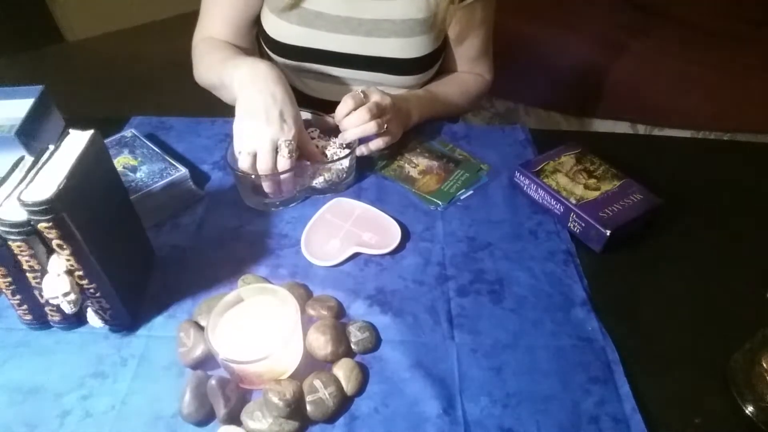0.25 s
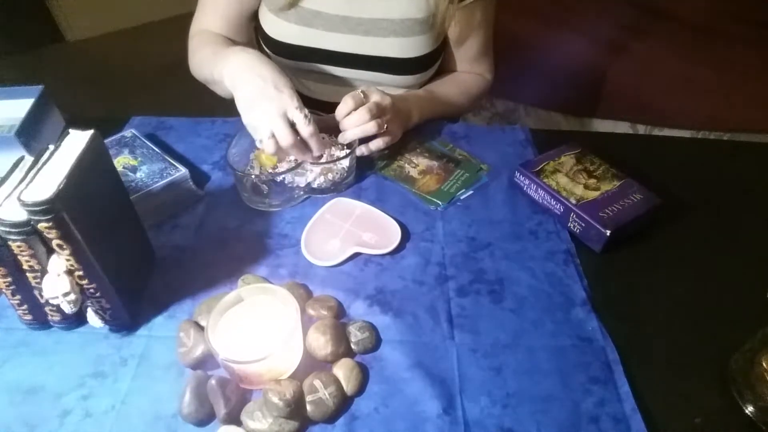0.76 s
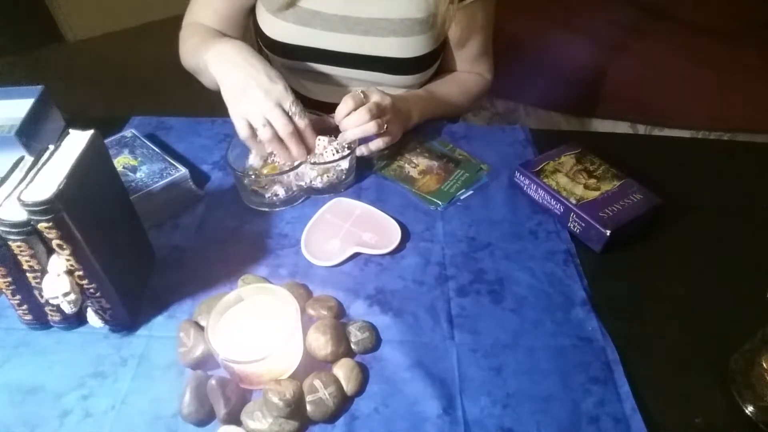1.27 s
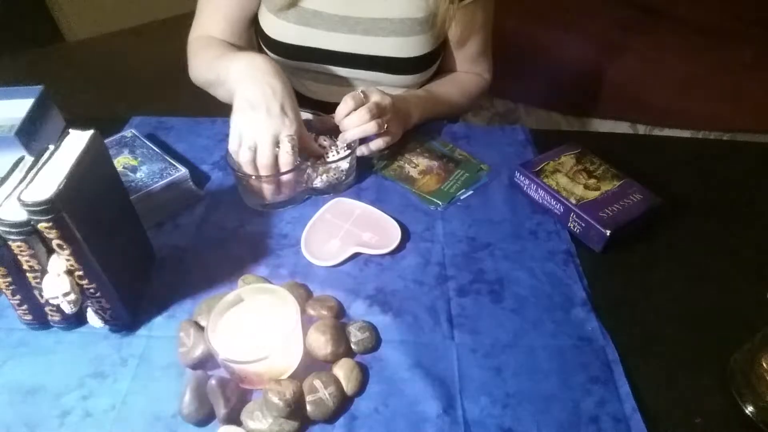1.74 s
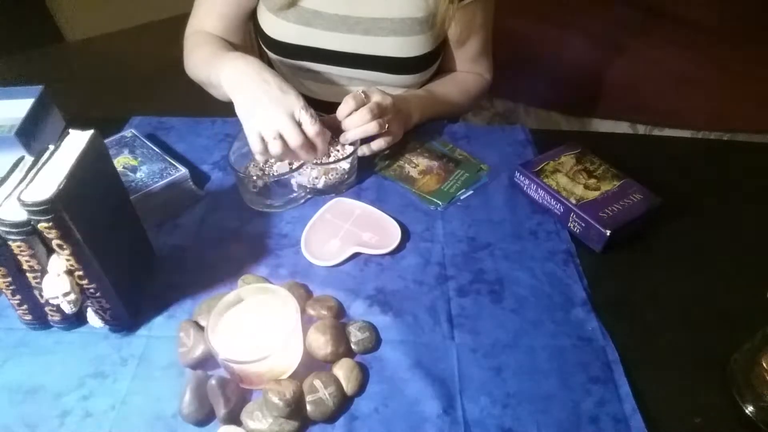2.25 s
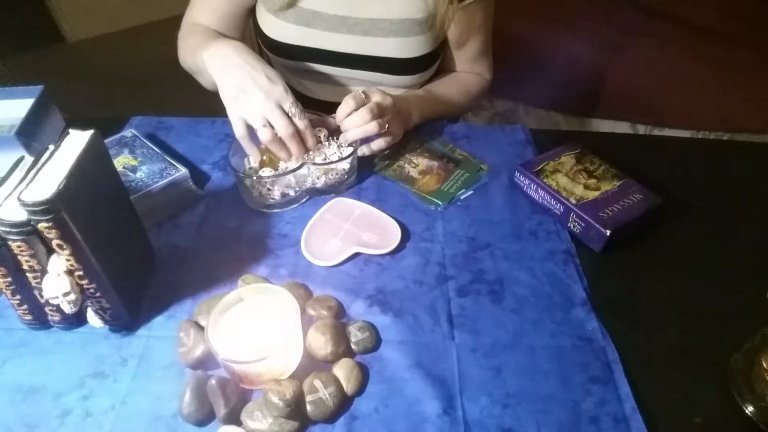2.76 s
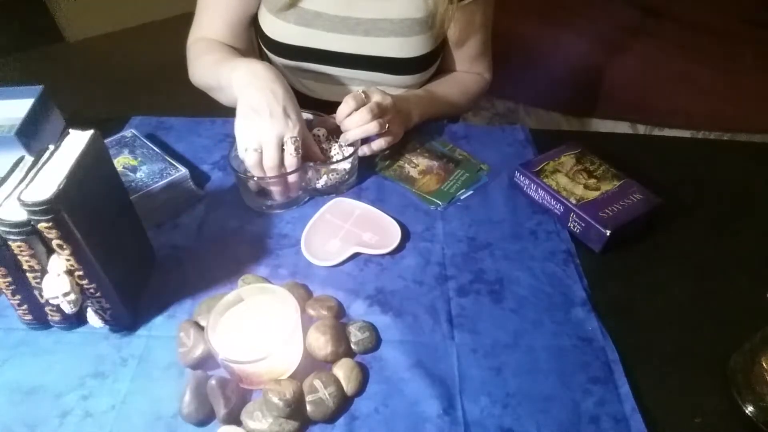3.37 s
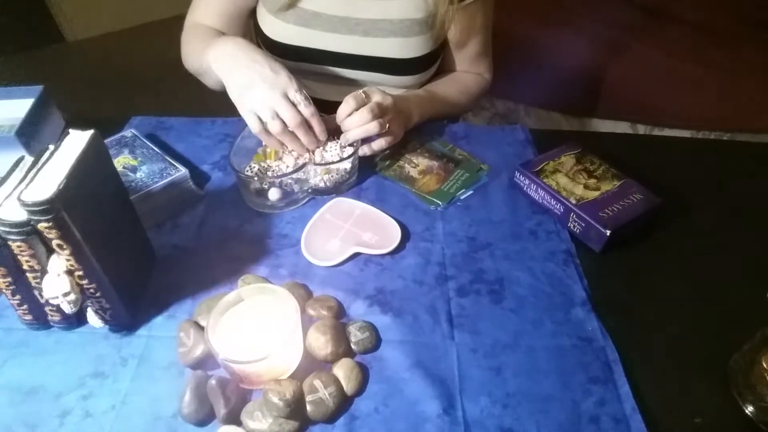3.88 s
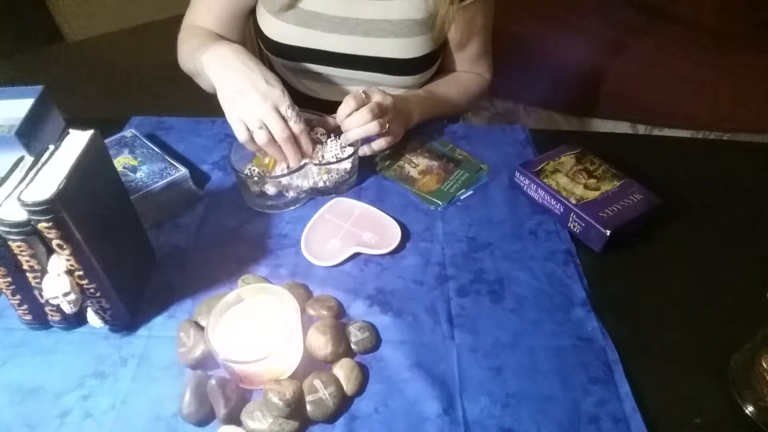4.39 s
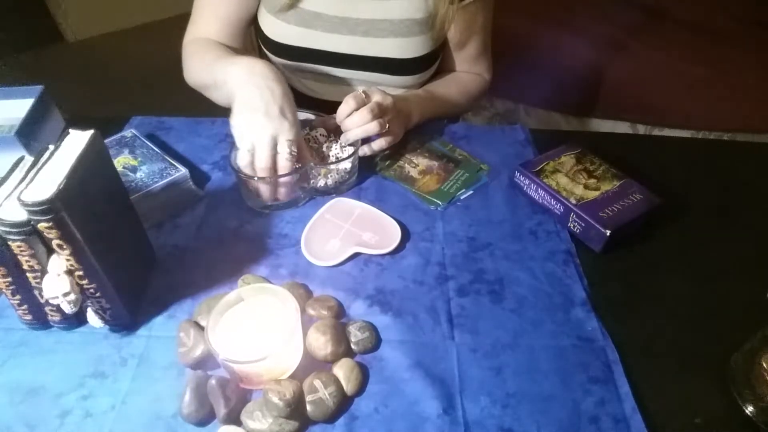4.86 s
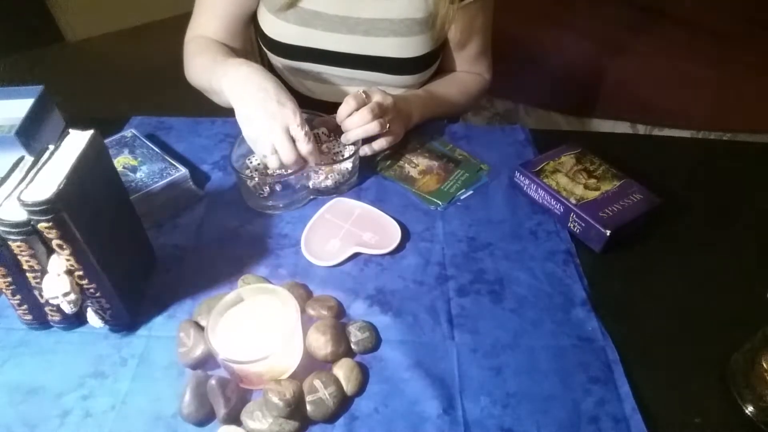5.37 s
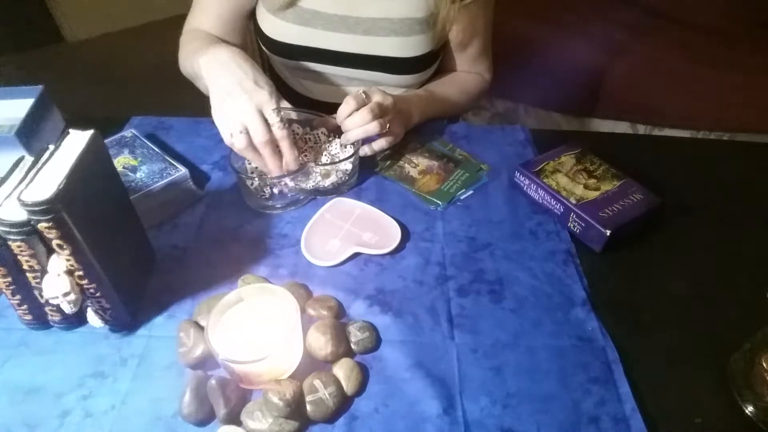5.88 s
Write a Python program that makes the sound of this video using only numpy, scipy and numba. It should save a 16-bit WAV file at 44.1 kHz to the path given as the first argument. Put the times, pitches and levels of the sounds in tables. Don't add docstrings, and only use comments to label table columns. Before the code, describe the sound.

A hand stirs small metal charms and beads in a glass bowl on a cloth-covered table, heard very close in stereo in a small quiet room with a short echo. After a faint start and brief gap, bright dry ticks and glassy clinks gather in quick pushes, with a hard clack near 0.4 s and a strong one at 0.9. The rattle is dense around 1.3 s, dips near 1.7, then continues in bursts, lively from 2.4 to 3.1 with heavier knocks. It nearly stops at about 3.2-3.3 s, resumes, thins near 4.1, and clacks loudly at 4.3 and 4.5 with ringing glass and a table thud. Another tiny lull comes around 4.75, then uneven stirring runs to the end just after 6 s, with bowl bumps near 5.5. Thin high charm pings and very faint rubbed whistles glint throughout over soft low room tone.

```python
import sys
import numpy as np
from scipy import signal
from scipy.fft import rfft, irfft, next_fast_len
from scipy.io import wavfile
from scipy.ndimage import uniform_filter1d
from numba import njit

SR = 44100
rng = np.random.default_rng(int(sys.argv[2]) if len(sys.argv) > 2 else 0)


def gain_from_db(level_db):
    decades = np.asarray(level_db, float) / 20
    return 10 ** decades


def generate_wav(sig):
    pcm = np.round(np.clip(np.atleast_2d(sig).T, -1, 1) * 32767).astype(np.int16)
    wavfile.write(sys.argv[1], SR, pcm)


N = 270377

# (frequency [Hz], level [dB], t60 [s])
BOWL_LOW = [(1017.4, 2.5, 0.068), (1116, 0, 0.065), (1235, -5, 0.06), (1724, 4, 0.036), (1810, 4, 0.03),
            (1890, -6, 0.02)]
# (frequency [Hz], level [dB], t60 [s])
BOWL_HIGH = [(2606, -7, 0.027), (2945, -10.5, 0.083), (3050, 1.5, 0.019), (3318, -5, 0.041),
             (3676, -1, 0.016), (3972, -1.5, 0.034), (4850, -1.5, 0.02), (4770, 5.5, 0.0079),
             (5150, 5, 0.019), (5940, -21, 0.051), (6000, 0, 0.041), (6850, 11, 0.01), (7326, 12, 0.0099),
             (7720, 2, 0.03)]
# (frequency [Hz], level [dB], t60 [s])
TABLE_TOP = [(139.7, -2.5, 0.052), (155.4, -8.5, 0.14), (200.2, 0, 0.13), (234.2, -2.5, 0.19),
             (284.2, 0.5, 0.083), (317.4, 6, 0.027), (394, -2.5, 0.11), (457.4, 1, 0.032),
             (499.4, 3.5, 0.044), (574, -5.5, 0.038)]
# (frequency [Hz], phase [rad])
PORT_SCATTER = [(150, 0.77), (600, 0.095), (3000, 0.79), (8000, 2.52), (14000, 1.5)]


def evened(x):
    return x / np.sqrt(np.mean(x ** 2) + 1e-20)


def read(points, hz):
    f, value = np.transpose(points)
    return np.interp(np.log(hz + 1), np.log(f + 1), value)


def shaped(x, gain):
    size = next_fast_len(x.shape[-1] + 2048)
    spectrum = rfft(x, size) * gain(np.fft.rfftfreq(size, 1 / SR))
    return irfft(spectrum, size)[..., :x.shape[-1]]


def add(mix, s, sound):
    part = mix[:, round(s * SR):][:, :sound.shape[1]]
    part += sound[:, :part.shape[1]]


def plateau(start, hold, rise, fall):
    t = np.arange(N) / SR
    return -rise * np.maximum(start - t, 0) - fall * np.maximum(t - start - hold, 0)


def rings(modes, count, detune, rise_s=0.00047):
    uneven_db = 5.5
    hz, db, t60 = np.transpose(modes)[:, None, None, :, None]
    t = np.arange(3600) / SR
    strength, pitch, phase = rng.standard_normal((3, count, 1, len(modes), 1))
    port_phase = phase * read(PORT_SCATTER, hz) * np.array([.5, -.5])[:, None, None]
    level = gain_from_db(db + uneven_db * np.clip(strength, -2, 1))
    decay = gain_from_db(-60 * t / t60) * np.minimum(t / rise_s, 1)
    tone = np.sin(2 * np.pi * hz * (1 + detune * pitch) * t + port_phase)
    return evened((level * decay * tone).sum(2))


def ticks(count, ms, snap=0.):
    # (frequency [Hz], level [dB])
    tick_colour = [(300, -40), (800, -22.5), (1500, -18.5), (2300, -23.5), (3500, -6), (5000, -6),
                   (7300, -3.5), (8300, -4.5), (10300, -4), (13000, -2), (15700, -1.5)]
    # (frequency [Hz], share [ratio])
    one_port = [(200, .3), (2000, 1.75), (6000, 0.9), (12000, 3.36)]
    shared = rng.standard_normal((count, 1, 800))
    own = rng.standard_normal((count, 2, 800))
    late_ms = (np.arange(800) - 60) * 1000 / SR
    envelope = (np.exp(-late_ms / ms) + snap * np.exp(-late_ms / .8)) * (late_ms >= 0)
    both = shared * envelope + shaped(own * envelope, lambda hz: read(one_port, hz))
    return evened(shaped(both, lambda hz: gain_from_db(read(tick_colour, hz))))[..., 40:]


@njit
def strike(responses, at, place, size, length):
    span = responses.shape[2]
    out = np.zeros((2, length + span))
    for k in range(len(at)):
        for port in range(2):
            for i in range(span):
                out[port, at[k] + i] += size[k] * responses[place[k], port, i]
    return out


def shower(responses, per_s, spread_db, level_db, reach):
    clump = gain_from_db(2.4 * evened(uniform_filter1d(rng.standard_normal(N), 900)))
    hit = rng.random(N) < per_s / SR
    sign = rng.choice([-1., 1.], N)
    size = np.minimum(rng.exponential(1, N), 4)
    fingers = np.arange(N) / SR * 14 + reach * rng.standard_normal(N)
    place = np.floor(fingers).astype(int) % len(responses)
    blows = evened(hit * sign * gain_from_db(spread_db * size) * clump) * gain_from_db(level_db)
    at = np.flatnonzero(blows)
    out = strike(np.ascontiguousarray(responses), at, place[at], blows[at], N)[:, :N]
    return out / np.sqrt(np.mean(np.sum(responses ** 2, 2)))


def hush():
    # (frequency [Hz], density [dB per Hz])
    tone_colour = [(15, -34), (30, -9), (55, 9.5), (90, -4.5), (130, 10.5), (260, -11), (1200, -21.5),
                   (7300, -43), (16000, -48)]
    level_db = -54.5
    noise = rng.standard_normal((1, N)) + 0.27 * rng.standard_normal((2, N))
    return gain_from_db(level_db) * evened(shaped(noise, lambda hz: gain_from_db(read(tone_colour, hz))))


def hand():
    # (time [s], rattle [dB], weight on the bowl [dB against the rattle])
    drag = [(0, -39.5, -1), (.06, -66.5, 7), (.15, -41.5, 3.5), (.7, -41.5, -5), (1.63, -37.5, -6),
            (1.72, -55, -14), (1.78, -41, -2), (3.141, -38.5, -3.5), (3.26, -71, -13), (3.3, -58, 5),
            (3.4, -37, -3.5), (3.95, -38.5, -4.5), (4.08, -48, -4), (4.35, -38.5, -4.5), (4.66, -40, 0),
            (4.758, -77, -22), (4.81, -51, 7.5), (6.13, -45, 0)]
    # (start [s], hold [s], rattle [dB], weight on the bowl [dB against the rattle])
    pushes = [(0.203, 0.068, -35, -4), (0.327, 0.068, -35, -28), (0.412, 0.024, -36, -7),
              (.48, 0.12, -37.5, -5), (0.782, 0.13, -36.5, -2.5), (0.928, 0.044, -33.5, -2.5),
              (1.026, 0.06, -41.5, -8), (1.207, 0.052, -34.5, -3.5), (1.325, 0.058, -30, -5),
              (1.438, 0.044, -33.5, -6.5), (1.791, 0.033, -35, -2), (1.953, 0.064, -36, -6),
              (2.078, 0.038, -33, -11.5), (2.167, 0.14, -38.5, -24), (2.42, 0.093, -37.5, -5),
              (2.752, 0.041, -31.5, -7.5), (2.871, 0.11, -31, -8.5), (3.394, 0.14, -42.5, -15),
              (3.561, 0.14, -34.5, -10), (3.783, 0.11, -39, -3), (4.165, 0.039, -39, -6.5),
              (4.31, 0.012, -45, 1), (4.429, 0.16, -34, -1.5), (4.894, 0.099, -37.5, -4.5),
              (5.092, 0.098, -37.5, -5.5), (5.263, 0.03, -35.5, -10), (5.358, 0.072, -39, -22),
              (5.52, .12, -34, -2.5), (5.78, 0.13, -35.5, -8), (6.032, 0.095, -37.5, -9.5)]
    s, level_db, weight_db = np.transpose(drag)
    t = np.arange(N) / SR
    glass = gain_from_db(2 * np.interp(t, s, level_db))
    table = glass * gain_from_db(2 * np.interp(t, s, weight_db))
    for start, hold, level_db, weight_db in pushes:
        push = gain_from_db(2 * (level_db + plateau(start, hold, rise=341, fall=199)))
        glass = glass + push
        table = table + push * gain_from_db(2 * weight_db)
    return 10 * np.log10(glass), 10 * np.log10(table / glass)


def rattle():
    # (frequency [Hz], level [dB], t60 [s])
    charm_modes = [(8920, -5, .06), (9170, -6, .05), (9670, -1, .06), (10800, -2, .03), (11000, -4, .03),
                   (11900, -2, .05), (12900, -3, .025), (14050, -1, .025), (15200, -3, .06),
                   (15620, 1, .045)]
    glass_db, weight_db = hand()
    lively_db = glass_db + 34
    fizz_db = glass_db - 3.5 + 0.069 * lively_db
    low_db = glass_db - 9.7 + 0.51 * weight_db - 0.018 * lively_db
    table_db = glass_db + weight_db - .7
    tick = ticks(count=70, ms=1.0)
    dull = shaped(tick, lambda hz: 1 / (1 + (hz / 9000) ** 12))
    high = rings(BOWL_HIGH, count=24, detune=0.01)
    fizz = rings(charm_modes, count=22, detune=0.0066)
    low = rings(BOWL_LOW, count=18, detune=0.02)
    rumble = rings(TABLE_TOP, count=16, detune=.012, rise_s=.004)
    mix = shower(dull, 1100, 2.6, glass_db - 4, reach=2.5)
    mix += shower(tick - dull, 2000, 1.9, fizz_db + 2.0, reach=3.5)
    mix += shower(high, 600, 2.14, glass_db - 2.5, reach=0.77)
    mix += shower(fizz, 800, 1.74, fizz_db - 2.5, reach=0.65)
    mix += shower(low, 700, 2.5, low_db - 2.5, reach=.8)
    return mix + shower(rumble, 800, 2.0, table_db - 2.5, reach=3.0)


def knocks():
    # (time [s], peak [dB], brightness [dB], low ring [dB])
    heavy_pieces = [(0.0986, -28, -3.5, -0.5), (0.418, -5.5, -16, -26), (0.5164, -14, -13, -13),
                    (0.6262, -15.5, -28, -13.5), (0.9313, -5.5, -37, -21), (1.102, -16, -14, -33),
                    (1.5828, -9.5, -41, -16), (1.6042, -11, -30, -23), (1.7445, -40, -9, 2),
                    (2.0617, -13.5, -31, -10.5), (2.2833, -16, -2, -26), (2.4057, -7.5, -28.5, -13),
                    (2.5556, -11, -22, -14), (2.659, -16, -48, -19), (2.7033, -25, -22, -0.5),
                    (2.7634, -10, -6, -29), (3.2975, -20.5, -20, -6.5), (3.3631, -24.5, -13, -3.5),
                    (3.893, -9.5, -21, -24), (4.2027, -17, -8, -22), (4.227, -15, -18, -38),
                    (4.297, -6, -12, -35), (4.5165, -12, -29, -17), (4.7774, -20.5, -46, -10.5),
                    (4.8045, -19, -33, -15), (5.229, -18, -10, -34), (5.5149, -20.5, -11, -9),
                    (5.5625, -17, -3, -13), (5.815, -25, -4, -3), (6.1041, -9, -10, -24)]
    # (time [s], peak [dB])
    light_taps = [(.168, -26), (.201, -22), (.247, -28), (.2725, -16.5), (.424, -16), (.454, -19),
                  (.807, -20), (.8617, -16), (.9103, -18), (.939, -19), (.944, -17), (.977, -18),
                  (1.003, -22), (1.055, -24), (1.2002, -19), (1.3976, -26), (1.531, -22), (1.611, -20),
                  (1.621, -17), (1.7694, -20), (2.1825, -21), (2.3, -21), (2.3984, -15), (2.448, -19),
                  (2.5275, -15), (2.5895, -17), (2.7487, -15), (2.757, -15), (2.7685, -12), (2.9097, -12),
                  (2.917, -14), (3.025, -19), (3.109, -15), (3.4007, -19), (3.6302, -19), (3.719, -14),
                  (3.881, -22), (3.995, -26), (4.15, -23), (4.461, -17), (4.523, -14), (4.531, -15),
                  (4.58, -18), (4.836, -22), (4.893, -25), (4.923, -24), (5.161, -17), (5.523, -13),
                  (5.635, -14), (5.729, -23), (5.7738, -21), (5.795, -19), (5.8555, -20), (5.878, -20),
                  (6.009, -28), (6.0566, -17), (6.0864, -30), (6.12, -15)]
    rows = heavy_pieces + [(s, db, -10, -13) for s, db in light_taps]
    mix, count = np.zeros((2, N)), len(rows)
    crack = ticks(count=count, ms=3.3, snap=1.6)
    high = rings(BOWL_HIGH, count=12, detune=.003)
    low = rings(BOWL_LOW, count=12, detune=0.012)
    thud = rings(TABLE_TOP, count=12, detune=0.051, rise_s=0.0042)
    bounce_s = rng.uniform(0.0052, 0.0092, count)
    for k, (s, peak_db, bright_db, low_db) in enumerate(rows):
        spot = k % len(high)
        sound = gain_from_db(-29) * high[spot]
        sound = sound + gain_from_db(low_db - 26.0) * low[spot] + gain_from_db(low_db - 23.0) * thud[spot]
        add(sound, 0, shaped(crack[k], lambda hz: gain_from_db(-13 + (bright_db + 1) / (1 + (9000 / (hz + 1)) ** 8))))
        add(mix, s - .0005, gain_from_db(peak_db) * sound)
        add(mix, s + bounce_s[k], gain_from_db(peak_db - 10) * sound)
    return mix


def bumps():
    # (time [s], level [dB])
    rocks = [(.16, -31), (.21, -27.5), (.795, -32), (.932, -28), (1.199, -39), (1.5, -35), (1.6, -35.5),
             (2.779, -31), (3.42, -33), (4.313, -31), (4.518, -23), (4.84, -33), (4.9, -35), (5.515, -28),
             (5.561, -23), (5.6, -28), (5.649, -33), (6.02, -34), (6.06, -33)]
    mix, count = np.zeros((2, N)), len(rocks)
    thud = rings(TABLE_TOP, count=count, detune=0.018, rise_s=0.0056)
    low = rings(BOWL_LOW, count=count, detune=0.0041)
    for (s, db), wood, glass in zip(rocks, thud, low):
        add(mix, s, gain_from_db(db - 14.5) * (wood + gain_from_db(-12.0) * glass))
    return mix


def pings():
    # (time [s], level [dB], frequency
    # [Hz], t60 [s])
    clinks = [(.416, -32, 1736, 0.13), (.419, -22.5, 3430, 0.075), (.419, -23, 5150, 0.049),
              (.626, -28.5, 3510, 0.056), (.932, -6, 6800, 0.024), (.933, -25.5, 2938, 0.14),
              (.934, -17, 5070, 0.05), (1.102, -25, 3900, 0.022), (1.203, -38, 1720, 0.061),
              (1.528, -22, 7300, 0.035), (1.605, -22, 6000, 0.047), (1.605, -20, 7770, 0.043),
              (1.606, -18.5, 4960, 0.1), (2.404, -29, 4000, 0.086), (2.406, -20.5, 5170, 0.05),
              (2.406, -30, 1786, 0.076), (2.51, -28, 4050, .05), (2.589, -31.5, 5170, 0.031),
              (2.658, -26, 1810, 0.029), (2.762, -25.5, 1800, 0.037), (2.763, -21, 5500, 0.022),
              (2.909, -29.5, 1890, 0.055), (2.973, -27, 5940, 0.043), (3.629, -32, 1810, 0.058),
              (3.636, -29, 4850, .045), (3.716, -17, 7800, .04), (3.895, -30, 1725, 0.12),
              (4.226, -22, 3900, 0.017), (4.298, -23.5, 3410, 0.11), (4.297, -11.5, 5180, 0.029),
              (4.297, -20, 7380, .03), (4.298, -30.5, 1777, 0.12), (4.519, -12.5, 6740, 0.033),
              (4.518, -8.5, 4880, 0.031), (4.519, -22.5, 2950, 0.092), (4.519, -17, 5480, .04),
              (5.163, -36, 1770, 0.061), (5.23, -23, 7100, 0.034), (5.231, -29, 5200, 0.037),
              (5.295, -29.5, 6730, 0.052), (5.516, -45, 1740, 0.14), (5.516, -36, 1025, 0.085),
              (5.731, -36.5, 1740, 0.028), (5.815, -35, 1725, 0.061), (5.855, -37, 1710, 0.081),
              (5.855, -23, 5150, 0.058), (6.058, -26, 4000, .05), (6.104, -21.5, 3990, 0.1),
              (6.104, -27, 3020, 0.058),
              (2.528, -29, 3750, 0.027), (2.556, -24, 7650, .03), (2.588, -28, 4050, .05),
               (2.659, -22.5, 3930, 0.032), (2.664, -39, 6000, .03), (2.758, -21, 3480, 0.032),
               (3.996, -42, 1840, 0.056), (4.0, -50, 1076, .1), (4.093, -49, 1550, 0.11),
               (4.114, -46, 1740, .06), (4.171, -38.5, 1706, 0.13), (4.214, -40, 1760, .06),
               (4.777, -35, 5150, 0.044), (4.777, -42, 1800, .08), (4.804, -36.5, 1755, 0.053),
               (4.836, -35, 1820, 0.064), (4.839, -34, 3350, .1), (.162, -38, 510, 0.31),
               (.2, -41, 1160, 0.093), (3.895, -28, 3420, 0.054), (3.897, -31, 4090, .06),
               (3.898, -31, 5150, .04), (3.99, -25, 5130, .03), (5.515, -17, 7130, 0.045),
               (5.56, -35, 1010, 0.078), (6.105, -20, 7400, .04), (6.119, -29, 4000, .04),
               (1.2, -36, 3480, 0.15), (2.284, -25, 7240, .025), (1.055, -32, 7560, .02),
               (.2, -23, 6960, .04), (1.583, -29, 5030, .015)]
    # (time [s], level [dB], frequency [Hz], t60 [s])
    charm_pings = [(.418, -16, 10900, 0.024), (.457, -34, 15590, .12), (1.028, -26, 14020, .14),
                   (1.062, -42, 14050, .08), (1.086, -36, 15500, .03), (1.101, -30, 15550, .04),
                   (1.103, -30.5, 8150, .06), (1.103, -30, 10340, 0.13), (1.103, -30, 11420, .25),
                   (1.103, -31, 9670, .05), (1.605, -19.5, 8900, 0.046), (1.606, -39, 13900, 0.38),
                   (1.656, -18, 15000, .06), (1.676, -24, 15300, .07), (2.371, -25, 15640, .08),
                   (2.557, -31, 9400, 0.084), (3.67, -18, 15500, .06), (3.792, -27, 13960, 0.1),
                   (3.825, -38, 14050, 0.11), (4.152, -28, 14070, .09), (4.222, -29, 14090, .09),
                   (4.287, -25, 15200, .04), (5.815, -33, 9700, .07), (4.298, -21.5, 9700, 0.045),
                   (4.555, -25, 9400, .05), (4.804, -38, 9600, 0.055),
                   (.2728, -23, 11100, .03), (.418, -24, 14300, .03), (.807, -27, 15600, .06),
              (.807, -22.5, 12800, 0.054), (1.783, -24, 12500, .03), (1.9455, -36, 12300, .03),
              (2.284, -27, 14300, .04), (2.36, -29, 14100, .04), (2.448, -23, 15600, .06),
              (2.75, -27, 15400, .05), (4.921, -31, 15400, .04), (5.324, -31, 11900, .04),
              (5.515, -27, 9650, .05), (5.635, -26, 14100, .04), (5.768, -33, 15600, .06),
              (5.795, -30, 9700, .03), (5.795, -31, 14000, .03), (5.815, -27, 10900, 0.03),
              (5.8636, -29, 14100, .04), (6.0187, -33, 14600, .04), (6.048, -27, 14300, .04),
              (6.0566, -21, 13900, .04), (6.0566, -20, 9380, .04), (6.0566, -28, 15600, .1),
              (6.0566, -29, 10900, .04), (4.298, -26, 10900, .04), (4.201, -35, 14100, .05),
              (4.48, -39, 11900, .2)]
    split = 0.02
    mix, t = np.zeros((2, N)), np.arange(9000) / SR
    for rows, side_db in ((clinks, -9), (charm_pings, -20)):
        draws = rng.standard_normal((len(rows), 3))
        for (s, db, hz, t60), (turn, up, down) in zip(rows, draws):
            phase = turn * read(PORT_SCATTER, hz) * np.array([[.5], [-.5]])
            wave = np.sin(2 * np.pi * hz * t + phase)
            for step in (1 + 1.06 * up, -1 + 0.31 * down):
                wave = wave + gain_from_db(side_db) * np.sin(2 * np.pi * hz * (1 + split * step) * t - phase)
            decay = gain_from_db(db - 1.5 - 60 * t / t60) * np.minimum(t / .0008, 1)
            add(mix, s, decay * wave)
    chatter = evened(uniform_filter1d(rng.standard_normal(N), round(.003 * SR)))
    return mix * (1 + .28 * chatter)


def whistles():
    # (loudest [s], level [dB], frequency [Hz], hold [s])
    rubbed = [(0.864, -52, 2920, .1), (3.84, -43.5, 2930, 0.088), (4.46, -47, 2920, 0.067),
              (5.573, -52, 2900, 0.1), (5.82, -47, 2930, 0.04), (4.178, -32, 15190, .015),
              (4.202, -24, 15215, .012), (4.236, -33, 15190, .035), (4.303, -29, 15205, .022),
              (4.613, -36, 15205, .03), (2.33, -46, 14050, .1), (5.405, -45, 14150, .035),
              (6.1, -45, 14100, .06)]
    mix = np.zeros((2, N))
    flutter = 1 + .4 * evened(uniform_filter1d(rng.standard_normal(N), 250))
    waver_hz = 14 * evened(flutter[::-1] - 1)
    for s, db, hz, hold in rubbed:
        swell_db = plateau(s - hold / 2, hold, rise=700, fall=700)
        mix += gain_from_db(db + swell_db) * flutter * np.sin(2 * np.pi * np.cumsum(hz + waver_hz) / SR)
    return mix


def room(x):
    # (frequency [Hz], t60 [s])
    wall_decay = [(200, 0.33), (1000, 0.3), (4000, 0.13), (12000, 0.12)]
    # (frequency [Hz], level [dB against the direct sound])
    echo_colour = [(150, -5.5), (600, -7), (3000, -1), (12000, 0.5)]
    taps = np.zeros((3, 2, SR // 3))
    at = np.arange(120, SR // 3 - 20, 20) + rng.integers(0, 20, (3, 2, (SR // 3 - 121) // 20))
    np.put_along_axis(taps, at, rng.choice([-1., 1.], at.shape), 2)
    hz, t, z = signal.stft(taps, SR, nperseg=256)
    decay = gain_from_db(-60 * t / read(wall_decay, hz)[:, None])
    tails = signal.istft(z * decay, SR, nperseg=256)[1]
    tails = shaped(tails / np.linalg.norm(tails[0, 0]), lambda hz: gain_from_db(read(echo_colour, hz)))
    cycles = np.arange(N) / SR * .9 + np.arange(3)[:, None] / 3
    turns = np.cos(2 * np.pi * cycles) * np.sqrt(2 / 3)
    return signal.fftconvolve((turns * x.mean(0))[:, None], tails, axes=2).sum(0)[:, :N]


def small(x):
    return shaped(x, lambda hz: 1 - 1 / (1 + (hz / 95) ** 8))


def scene():
    bowl = small(rattle() + knocks() + pings() + whistles())
    return bowl + room(bowl) + hush() + small(bumps())


def band_limit(x):
    return signal.sosfilt(signal.butter(12, 17010, fs=SR, output="sos"), x)


def record(dry):
    # (frequency [Hz], left minus right [dB])
    port_lean = [(30, -3), (70, 1), (130, -10), (260, -4), (700, -4.5), (1400, -6), (2800, -3.5),
                 (5500, 4.5), (9000, -5), (12000, -8), (15500, -6)]
    # (frequency [Hz], left minus right [rad])
    port_lead = [(100, 0), (1290, -.2), (1890, .4), (3360, -.7), (3960, -.1), (5430, -.2), (5940, -1.1),
                 (6720, .2), (7150, -.8), (10900, -3.2), (12900, -.2), (16000, -2.1)]
    side = np.array([[.5], [-.5]])
    ports = shaped(dry, lambda hz: gain_from_db(side * read(port_lean, hz)) * np.exp(1j * side * read(port_lead, hz)))
    limited = shaped(ports, lambda hz: gain_from_db(-50 * np.clip((hz - 15700) / 220, 0, 1)))
    return band_limit(limited)


dry = scene()
out = record(dry)
generate_wav(out)
```